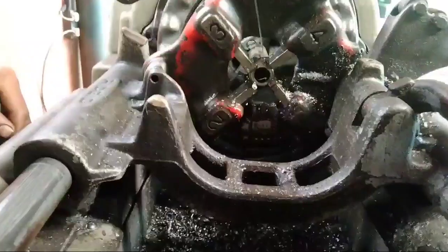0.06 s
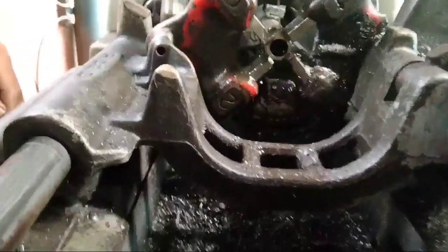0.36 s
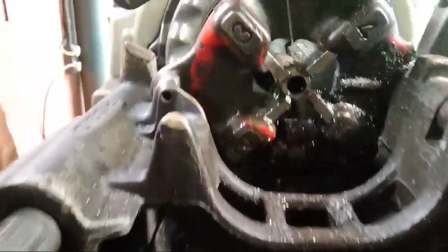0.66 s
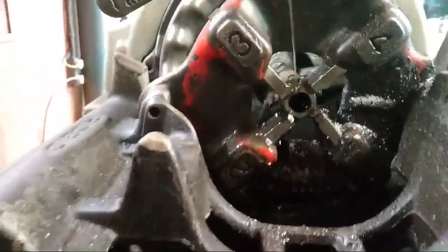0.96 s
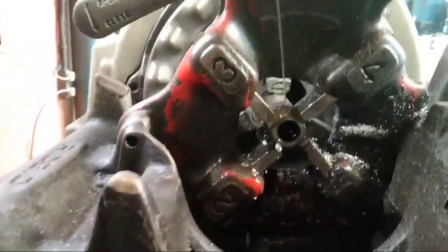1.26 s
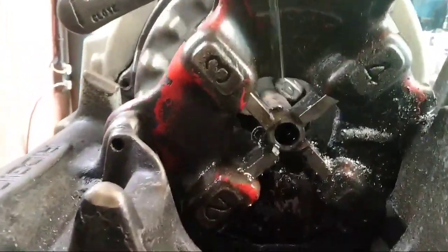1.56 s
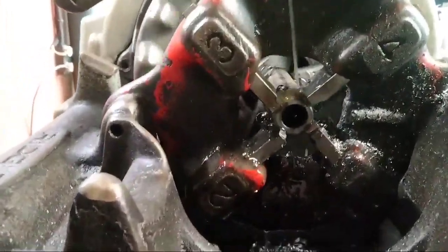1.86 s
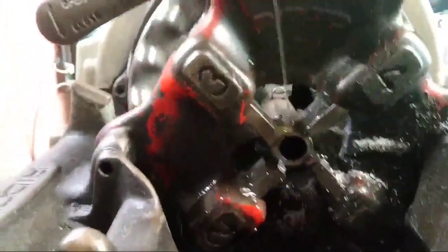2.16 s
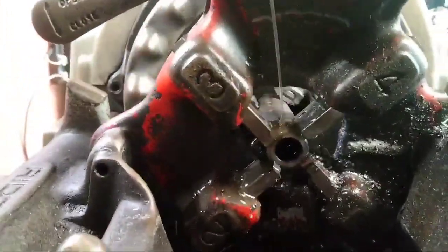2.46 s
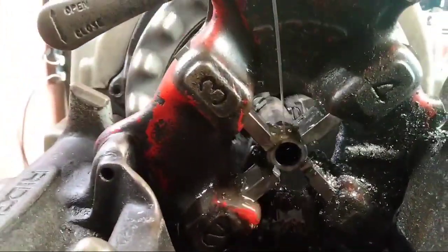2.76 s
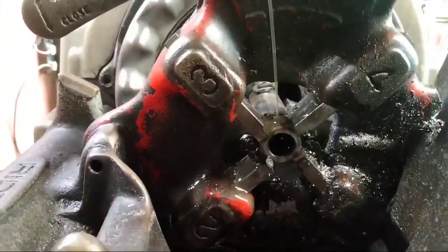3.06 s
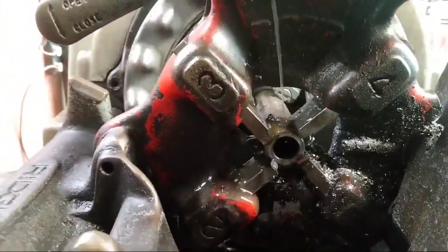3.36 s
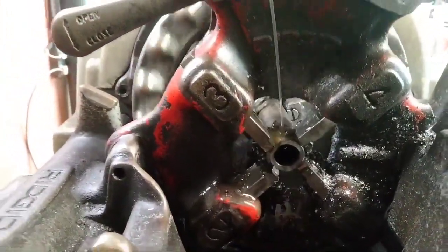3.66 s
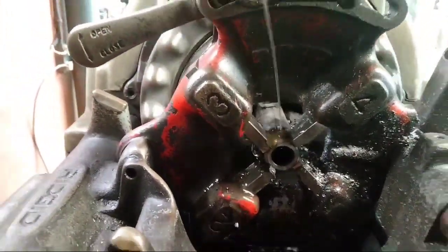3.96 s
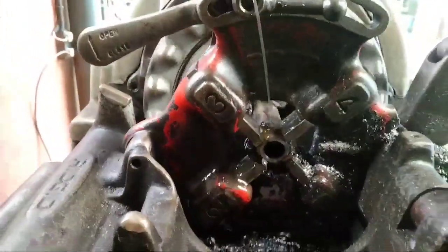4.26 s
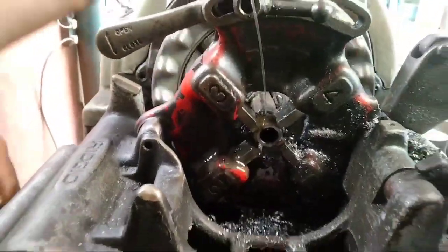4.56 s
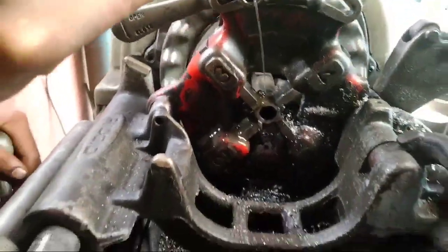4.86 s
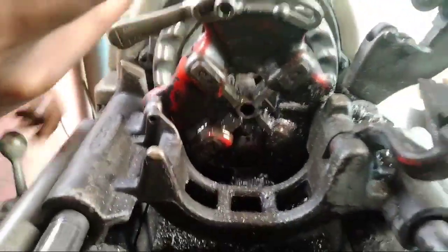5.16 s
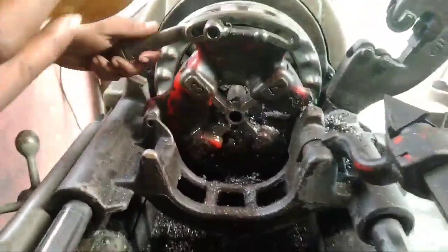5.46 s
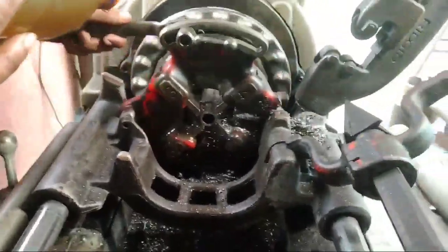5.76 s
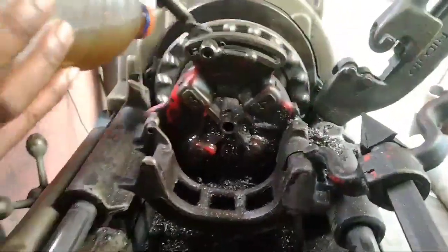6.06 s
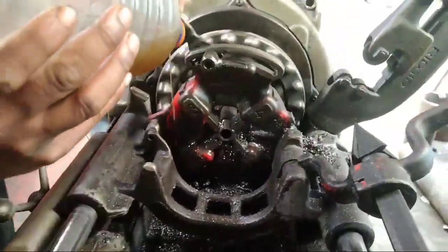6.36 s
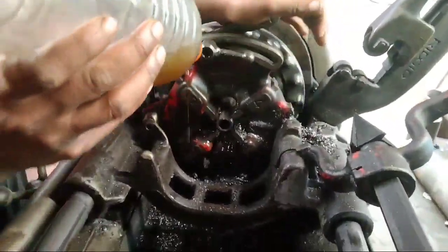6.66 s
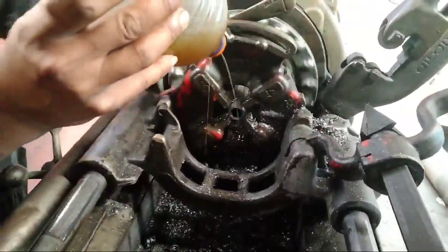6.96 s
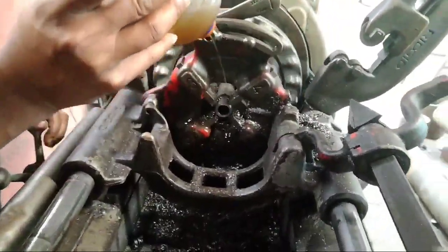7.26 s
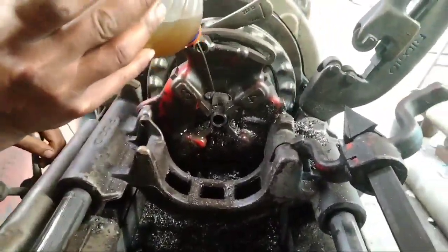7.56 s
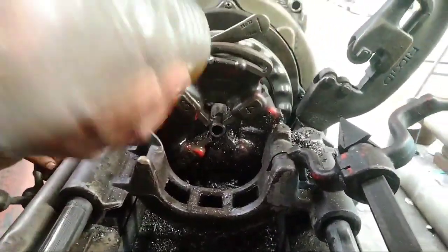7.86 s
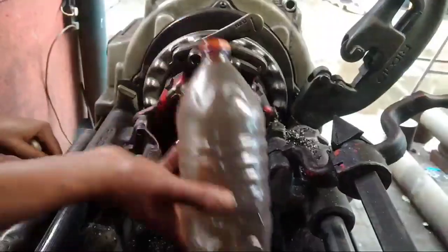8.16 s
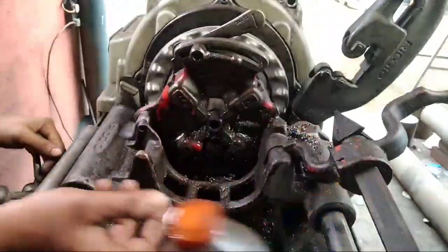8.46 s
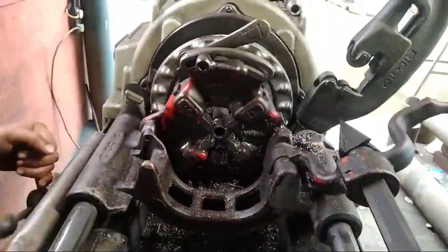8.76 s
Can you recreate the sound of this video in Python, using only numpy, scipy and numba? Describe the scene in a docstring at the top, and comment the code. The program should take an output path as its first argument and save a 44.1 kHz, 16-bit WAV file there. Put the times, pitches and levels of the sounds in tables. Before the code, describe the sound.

A pipe threading machine is heard from the start, cutting a thread with a steady, clear motor hum. Gears and bearings whine above it and the dies grind, with light metallic squeaks in the first second and a half and another near 3 seconds. From about 1 to 4.5 seconds the microphone is close to the die head, so the sound is slightly louder and the hiss of metal chips brighter. More small squeaks come around 5.5 seconds.

Near 6 seconds the dies open and the hum drops away. The motor runs up a little in pitch, leaving a softer, rougher whir of fan air and loose gears. A small knock comes at about 6.7 seconds, a faint high whistle around 7.3, and a thin ring from roughly 7 to 8.5 seconds. At about 8.5 seconds the motor begins to slow and its tone falls.

```python
"""At the die head of a pipe threading machine. Under load the fast motor hums a clear tone,
gears and bearings whine at ratios of its speed, the oiled dies grind, chips hiss and metal squeaks.
Near 6 s the dies open: the hum drops away, the motor runs up, slack gears sing softly and
fan air and loose teeth leave a rough whir, with a high whistle and a ring. At the end the motor slows."""
import sys
import numpy as np
from scipy import signal
from scipy.fft import rfft, irfft
from scipy.io import wavfile
from numba import njit

SR = 44100
rng = np.random.default_rng(int(sys.argv[2]) if len(sys.argv) > 2 else 0)


def to_wav(sig):
    """Store sig (one row per channel, or 1-D mono) as 16-bit WAV at the path in sys.argv[1].

    Samples outside -1..1 are clipped; the rate is SR.
    """
    pcm = np.clip(np.atleast_2d(sig), -1, 1) * 32767
    pcm = np.round(pcm).astype(np.int16)
    wavfile.write(sys.argv[1], SR, pcm.T)  # frames by channels


N = 392490

START_S, EASE_S, OPEN_S, SLACK_S, SLOW_S = 0.11, 4.04, 5.87, 6.21, 8.53
ATTACK_S, LET_GO_S = 0.064, 0.014
FREE_HZ, DRAG_RUN_UP_S, FREE_RUN_UP_S, SLOWING_HZ_PER_S = 397, .72, .35, 150
WHEEL_RATIO, FRONT_RATIO, REAR_RATIO, RACE_RATIO = .2717, 1.04875, 3.078, 5.312  # per shaft turn
HISS_FAR_HZ, HISS_NEAR_HZ, TREBLE_HZ, TOP_HZ = 3400, 7620, 4560, 15450
WHIR_DB, WHIR_LOADED_DB, WHIR_SCREENED_DB = -0.86, -4, -8
FLUTTER_HZ, FLUTTER_DEPTH = 28.3, 0.31

# shaft speed in the cut (time [s], rate [Hz])
CUT_SPEED = [(0.25, 354.1), (0.8, 348.9), (1.4, 348.2), (1.85, 343.5), (2.1, 343.3), (2.65, 345.7),
             (2.8, 342.3), (3.1, 341.2), (3.6, 342.7), (3.95, 345.8), (4.2, 342.0), (4.8, 342.7),
             (5.25, 344.2), (5.4, 341.5), (5.85, 340.3)]
# microphone path to the die head and back (time [s], closeness [0-1], chip hiss level [dB])
MIC_PATH = [(.2, 0.1, -85), (.38, 0, -94), (.56, 0.3, -102), (.75, 0.4, -99), (1, 0.7, -111),
            (1.5, 0.99, -101), (2.2, 0.97, -92.5), (3.6, 0.94, -92), (4.15, 0.88, -90), (4.5, 0.83, -94),
            (4.9, 0.51, -95.5), (5.4, 0.17, -89.5), (5.8, 0.02, -88), (6.3, 0.05, -105)]

# partials (multiple of the part's rate, level [dB])
SHAFT_PARTIALS = [(2, -56), (3, -67), (4, -74), (6, -77), (7, -67.5), (10, -82), (21, -82), (22, -88)]
FRONT_PARTIALS = [(4, -59.5), (8, -72.5), (12, -60), (16, -67), (18, -91), (19, -79), (20, -76), (21, -83),
                  (22, -85.5), (23, -79), (24, -72.5), (25, -84), (27, -82), (28, -79.5), (29, -80),
                  (30, -89), (31, -79), (32, -86), (34, -88), (35, -77), (36, -78), (37, -86), (39, -92),
                  (40, -88), (43, -86)]
REAR_PARTIALS = [(1, -73.5), (2, -62), (3, -66.5), (4, -64), (5, -78), (7, -96), (8, -91)]
RACE_PARTIALS = [(1, -69), (2, -76.5), (4, -91)]
# gear wheel partials (multiple of wheel rate, level [dB], swell period [s], crest [s], depth [0-1])
WHEEL_PARTIALS = [(1, -89, 1.39, 0.84, 0.45), (2, -74, 1.4, 0.98, 0.17), (3, -62.5, 0.9, 1.39, 0.24),
                  (4, -63, 0.8, 1.51, 0.13)]
# sum and difference tones of the mesh (multiple of shaft rate, level [dB])
MESH_TONES = [(0.737, -70.5), (1.274, -72.5), (1.621, -72.5), (1.73, -71), (2.096, -67), (2.26, -70.5),
              (2.543, -77), (3.29, -80.5), (3.354, -70.5), (3.651, -78), (3.76, -74), (4.02, -73),
              (3.92, -65), (4.47, -69.5), (4.79, -75), (5.19, -65.5), (5.26, -75), (5.59, -72), (6.31, -80),
              (6.7, -75), (7.24, -82), (8.09, -72), (8.57, -85), (9.506, -82), (10.91, -81), (11.48, -68.5),
              (11.8, -79), (11.98, -71), (12.04, -68), (12.23, -71), (19.3, -85), (19.86, -85), (22.2, -84)]
# slack gear tones (multiple of wheel rate added to shaft rate, level [dB])
SLACK_TONES = [(1, -66.5), (2, -65.5)]
# bearing pressure depth (at wheel rate [0-1], at twice wheel rate [0-1], at shaft rate [0-1])
PRESS_DEPTHS = (0.19, 0.12, 0.24)

# noise spectra (frequency [Hz], density [dB/Hz])
GRIND_SPECTRUM = [(25, -135), (75, -118), (150, -104.6), (230, -94.5), (310, -81.5), (390, -88), (470, -95),
                  (620, -84), (900, -89), (1150, -89), (2200, -86), (4200, -96.5), (5000, -103),
                  (10000, -109), (15000, -122)]
WHIR_SPECTRUM = [(40, -124), (130, -111), (220, -96.5), (330, -82), (460, -88), (700, -81.5), (1150, -95),
                 (1600, -88), (2500, -87), (3600, -82.5), (4700, -96.5), (7500, -100.3), (9200, -107.5),
                 (10000, -104.5), (11200, -106.5), (12000, -113.5), (12900, -107), (14000, -118),
                 (15000, -120)]
# resonances (centre [Hz], width [Hz], gain [dB])
CASTING_MODES = [(1075, 51, 9.5), (1262, 14, 9.5), (1600, 31, 0.5), (2242, 44, 9.5), (2885, 39, 9),
                 (2994, 72, 9.5), (3250, 51, 5), (4700, 34, 3), (4570, 210, -21)]
HEAD_MODES = [(566, 31, 6.5), (990, 45, -4.5), (1177, 58, 5), (1325, 68, 7.5), (2130, 300, 2.5),
              (2440, 23, 7.5), (2420, 140, -0.5), (4260, 380, 6), (4880, 550, 4.5)]
DIE_MODES = [(4120, 480, 5.5), (5250, 240, 4), (6500, 120, 1), (5730, 1900, -5), (7300, 110, 5),
             (7540, 170, 5), (8850, 200, 1), (7730, 250, -6), (8150, 430, 3), (11100, 1600, 8),
             (15100, 3000, -2)]
HOUSING_MODES = [(350, 240, 2), (665, 42, 5.5), (752, 67, 3), (903, 31, 3.5), (1025, 25, 4.5),
                 (1088, 22, 8), (1890, 62, 2), (2180, 110, 7), (2390, 49, 3), (2930, 21, 8.5),
                 (3040, 44, 6.5), (3430, 91, -9), (3340, 32, 7.5), (3450, 36, 11), (3620, 30, 4.5),
                 (3820, 370, 3.5), (11530, 110, 8)]

# part levels (cutting [dB], change when close [dB], as cut eases [dB], as dies open [dB], free [dB])
HUM_DB = (-46.5, 1.5, -4.5, -3.5, -64)
WHEEL_DB = (0.2, 0.1, -5, -4, -18)
SHAFT_DB = (-2.5, 2, 1, -7.5, -13)
MESH_DB = (-3.5, 2.5, 1, -15, -8)
FRONT_DB = (-5, 2, -1.5, 1.5, -18)
REAR_DB = (-1, 0.9, 0, -8.5, -21)
TREBLE_DB = (-6.5, 7, 4, 4, -11)
GRIND_DB = (-2, 1.5, -8, 4, -11.5)

# swells and dips (centre [s], length [s], change [dB])
HUM_SWELLS = [(1.53, .15, -2.5), (2.76, 0.14, -2), (4.13, 0.17, -2.5), (5.96, 0.16, 4.5), (6.19, 0.09, 1.5),
              (8.88, 0.4, 6.5)]
SHAFT_DIPS = [(.2, .7, -3)]  # overtones build as the dies bite
WHINE_TREBLE_DIPS = [(1.4, 1.6, -3), (6.1, 0.35, -6)]
GRIND_DIPS = [(5.94, .1, -6), (6.28, 0.17, -13)]  # dies let go, gears go slack
GRIND_TREBLE_SWELLS = [(.85, 0.37, 1), (5.9, 1.2, -5)]
WHIR_SWELLS = [(5.95, 0.18, -1.5), (6.29, .19, -2), (6.62, .25, 0.4), (7.07, 0.38, 0.7)]
# single bearing partials squeal or sink (centre [s], length [s], multiple of its rate, change [dB])
FRONT_SQUEALS = [(2.25, 0.43, 4, 4.5), (3.22, 0.17, 4, -9), (4.9, 0.93, 4, 8), (5.68, .25, 4, 4.5),
                 (6.14, 0.11, 4, 8), (0.98, 0.8, 8, 12), (1.85, .35, 8, -3), (3.6, .6, 8, -8),
                 (4.3, 0.38, 8, 4.5), (6.07, 0.13, 8, 6.5), (0.68, 0.87, 12, 9.5), (2.1, 1.6, 12, -4.5),
                 (3.7, .6, 12, -3), (4.19, .36, 12, 6.5), (4.93, 0.99, 12, 8.5), (6.3, 0.6, 12, -12),
                 (.82, 0.4, 16, 4.5), (1.2, .3, 16, -8), (1.6, 1.3, 16, -3.5), (4.6, 0.87, 16, 3),
                 (5.8, 0.73, 16, -8), (3.2, .9, 24, 5.5), (4.22, 0.22, 24, 9), (0.97, 0.8, 27, 13),
                 (4.8, 0.94, 29, 9), (4.2, .2, 36, 4.5), (5.45, 0.18, 36, 9)]
REAR_SQUEALS = [(.3, 0.45, 1, 6.5), (0.95, .8, 2, -8), (4.9, 0.76, 2, -13), (5.7, 0.27, 2, 2.5),
                (6.09, 0.17, 2, 9), (0.89, 0.53, 3, 4.5), (5, 0.45, 3, -5), (.65, 0.97, 4, 4),
                (1.9, 1, 4, -16), (3.1, 0.66, 4, 4.5), (4.8, .25, 4, -11), (5.15, 0.88, 4, 5.5),
                (4.9, .2, 5, 9)]
# metallic squeaks and rings in the cut; a high whistle and a ring while running free
# (centre [s], length [s], pitch [Hz], level [dB], phase jitter [rad])
SQUEAKS_AND_RINGS = [(0.26, 0.4, 3600, -63, .95), (.35, 1.14, 1125, -60, 0.9), (0.5, 0.45, 3000, -62, .95),
                     (.38, 0.33, 8300, -84, .6), (0.63, 0.14, 8310, -74, .9), (1, 0.93, 1150, -63, 0.9),
                     (1, 0.91, 8400, -85, .6), (3, 0.58, 2443, -62, 0.7), (5.45, .3, 1810, -63, 1),
                     (5.42, .2, 2000, -62, 0.9), (5.8, 0.2, 3140, -62, .7), (5.55, .5, 2040, -62.5, 0.8),
                     (5.65, .5, 4100, -62, 0.8), (7.27, 0.66, 6900, -73, 0.45), (7.8, 1.5, 3484, -65, .9)]
# knock in the whir (time [s], gain [dB], decay [s])
KNOCKS = [(6.657, -4, 0.0062)]

TIME_S = np.arange(N) / SR


def undb(db):
    """Decibels to gain."""
    return np.exp(np.float32(db) * np.float32(np.log(10) / 20))


def curves(table):
    """Each column interpolated over time."""
    times_s, *columns = np.transpose(table)
    return [np.interp(TIME_S, times_s, column) for column in columns]


def ramp(start_s, length_s):
    """Linear rise from 0 to 1."""
    return np.clip((TIME_S - start_s) / length_s, 0, 1)


def arch(centre_s, length_s):
    """Rounded rise to 1 and back, length_s wide at half height."""
    return 2 ** -np.minimum(np.abs(2 * (TIME_S - centre_s) / length_s) ** 3, 40)


def swells_db(table):
    """Sum of rounded level changes."""
    return sum(db * arch(centre_s, length_s) for centre_s, length_s, db in table)


def walk(rate_hz):
    """Random glide, spread near 1."""
    step = max(int(SR / rate_hz), 2)
    points = rng.standard_normal((N // step + 3, 1), dtype=np.float32)
    glides = points[:-1] + np.diff(points, axis=0) * np.arange(step, dtype=np.float32) / step
    return 1.22 * glides.ravel()[rng.integers(step):][:N]


def highpass(x, hz):
    """Zero-phase high-pass."""
    return signal.sosfiltfilt(signal.ellip(6, .1, 40, hz, "high", fs=SR, output="sos"), x)


@njit
def bandpass(x, centre_hz, width_hz):
    """Moving band-pass, unity peak gain."""
    y, band, low = np.empty(len(x)), 0., 0.
    for i in range(len(x)):
        g, damping = np.tan(np.pi * centre_hz[i] / SR), width_hz[i] / centre_hz[i]
        v = (band + g * (x[i] - low)) / (1 + g * (g + damping))
        band, low, y[i] = 2 * v - band, low + 2 * g * v, damping * v
    return y


def resonate(x, modes, colour_db=0):
    """Peaks and notches on top of a broad colour."""
    hz = np.arange(N // 2 + 1, dtype=np.float32) * SR / N
    modes_db = sum(db / (1 + (2 * (hz - centre_hz) / width_hz) ** 2) for centre_hz, width_hz, db in modes)
    return irfft(rfft(np.float32(x)) * undb(colour_db + modes_db), N)


def noise(spectrum, modes):
    """Noise shaped by a spectrum and resonances."""
    points_hz, levels_db = np.transpose(spectrum)
    bins_hz = np.arange(1, N // 2 + 2) * SR / N
    colour_db = np.interp(np.log(bins_hz), np.log(points_hz), levels_db)
    return resonate(rng.standard_normal(N), modes, colour_db) * np.sqrt(SR / 2)


def tone(angle, rms_db, waver_db, waver_hz):
    """Sine of wavering level; angle in radians."""
    turns = angle / (2 * np.pi) + rng.random()
    wave = np.sin(np.float32(turns - np.floor(turns)) * (2 * np.pi))
    return 2 ** .5 * undb(rms_db + waver_db * walk(waver_hz)) * wave


def partials(angle, table, waver_db, waver_hz, fade_db=0, squeals=()):
    """Harmonics of a rotation; random fading grows by fade_db per order."""
    total = 0
    for order, db in table:
        own_squeals = [(s, length_s, change_db) for s, length_s, k, change_db in squeals if k == order]
        level_db = db + swells_db(own_squeals) + fade_db * order * np.tanh(walk(7.6))
        total += tone(order * angle, level_db, waver_db, waver_hz)
    return total


def part_db(levels_db, near):
    """Level of a part through cutting, easing, die opening and free running."""
    cut_db, near_db, eased_db, open_db, free_db = levels_db
    eased = ramp(EASE_S, OPEN_S - EASE_S) ** 1.3
    opened = ramp(OPEN_S, SLACK_S - OPEN_S)
    slack = ramp(SLACK_S - LET_GO_S / 2, LET_GO_S)
    loaded_db = cut_db + near_db * near + eased_db * eased + open_db * opened
    return (1 - slack) * loaded_db + slack * free_db


def motor_load():
    """Load share: decays slowly while the opening dies drag, then faster."""
    dragging_s = np.clip(TIME_S - OPEN_S, 0, SLACK_S - OPEN_S)
    free_s = np.maximum(TIME_S - SLACK_S, 0)
    return np.exp(-dragging_s / DRAG_RUN_UP_S - free_s / FREE_RUN_UP_S)


def motor_speed_hz(load):
    """Load holds the motor below free speed; at the end it slows steadily."""
    (cutting_hz,) = curves(CUT_SPEED)
    slowing_hz = SLOWING_HZ_PER_S * np.maximum(TIME_S - SLOW_S, 0)
    return FREE_HZ + load * (cutting_hz - FREE_HZ) - slowing_hz


def motor_hum(shaft, near):
    """The spinning shaft hums one clear tone."""
    return tone(shaft, part_db(HUM_DB, near) + swells_db(HUM_SWELLS), waver_db=0.4, waver_hz=30)


def gear_drone(wheel):
    """Low gear wheel partials, each beating slowly and evenly."""
    angle = wheel + 0.1 * walk(18)
    total = 0
    for order, db, period_s, crest_s, depth in WHEEL_PARTIALS:
        beat = 1 + depth * np.cos(2 * np.pi * (TIME_S - crest_s) / period_s)
        total += tone(order * angle, db, waver_db=1.1, waver_hz=13) * beat
    return total


def gear_mesh(shaft):
    """Meshing parts give sum and difference tones."""
    return sum(tone(ratio * shaft + 0.31 * walk(18), db, waver_db=2.5, waver_hz=9)
               for ratio, db in MESH_TONES)


def bearing(shaft, wheel, ratio, table, slip_rad, chatter_rad, fade_db, squeals=()):
    """Balls slip and chatter over a flaw, fraying high partials; wheel and shaft press on them."""
    angle = ratio * shaft + slip_rad * walk(25) + chatter_rad * walk(160)
    rolling = partials(angle, table, waver_db=1.52, waver_hz=26, fade_db=fade_db, squeals=squeals)
    pressure = sum(depth * np.cos(np.float32(turn) + 2 * np.pi * rng.random())
                   for depth, turn in zip(PRESS_DEPTHS, (wheel, 2 * wheel, shaft)))
    return rolling * (1 + pressure)


def drive_whine(shaft, wheel, near):
    """Gears and bearings whine through the casting; the treble flutters."""
    gears = gear_drone(wheel) * undb(part_db(WHEEL_DB, near))
    overtones = partials(shaft, SHAFT_PARTIALS, waver_db=1.13, waver_hz=14)
    overtones *= undb(part_db(SHAFT_DB, near) + swells_db(SHAFT_DIPS))
    mesh = gear_mesh(shaft) * undb(part_db(MESH_DB, near))
    race = bearing(shaft, wheel, RACE_RATIO, RACE_PARTIALS, slip_rad=0.16, chatter_rad=0.061, fade_db=3)
    front = bearing(shaft, wheel, FRONT_RATIO, FRONT_PARTIALS,
                    slip_rad=0.026, chatter_rad=0.013, fade_db=0.12, squeals=FRONT_SQUEALS)
    rear = bearing(shaft, wheel, REAR_RATIO, REAR_PARTIALS,
                   slip_rad=0.13, chatter_rad=0.044, fade_db=0.9, squeals=REAR_SQUEALS)
    whine = mesh + front * undb(part_db(FRONT_DB, near)) + (rear + race) * undb(part_db(REAR_DB, near))
    treble_db = part_db(TREBLE_DB, near) + swells_db(WHINE_TREBLE_DIPS) + 2 * walk(130)
    whine += highpass(whine, TREBLE_HZ) * (undb(treble_db) - 1)
    return resonate(gears + overtones + whine, CASTING_MODES)


def grinding(shaft, wheel, near, hiss_db):
    """Teeth and dies scrape; scrape and chip hiss pulse with wheel and shaft."""
    pulse = 1 + 0.07 * np.cos(wheel) + 0.072 * np.cos(shaft) + 0.069 * np.cos(2 * shaft)
    level_db = part_db(GRIND_DB, near) + swells_db(GRIND_DIPS)
    scrape = noise(GRIND_SPECTRUM, HEAD_MODES)
    scrape *= undb(level_db + 1.23 * walk(220) + 1.27 * np.tanh(walk(24.62)))
    scrape += highpass(scrape, TREBLE_HZ) * (undb(swells_db(GRIND_TREBLE_SWELLS)) - 1)
    return (scrape + chip_hiss(near, hiss_db)) * pulse


def chip_hiss(near, hiss_db):
    """Chips hiss; an echo off the die head picks a band, higher when close, and its weak octave."""
    centre_hz = HISS_FAR_HZ * (HISS_NEAR_HZ / HISS_FAR_HZ) ** near
    width_hz = 0.34 * centre_hz
    rush = rng.standard_normal(N) * np.sqrt(SR / 2) * undb(hiss_db + 0.82 * walk(150) + 0.46 * walk(14))
    band = bandpass(bandpass(rush, centre_hz, width_hz), centre_hz, width_hz)
    octave = bandpass(rush, 2 * centre_hz, 2 * width_hz)
    return resonate(band + undb(-20.5) * octave, DIE_MODES)


def housing_whir(load, near):
    """Fan air and loose teeth rattle, louder off load; close in, the die head screens them."""
    level_db = WHIR_DB + WHIR_LOADED_DB * load + WHIR_SCREENED_DB * near + swells_db(WHIR_SWELLS)
    rattle = undb(level_db + 0.79 * walk(400) + 0.25 * walk(70) + 0.042 * walk(5.9))
    return noise(WHIR_SPECTRUM, HOUSING_MODES) * (rattle + knock_gain())


def squeaks_and_rings():
    """Frayed, fluttering metallic tones: squeaks and rings in the cut, a whistle and a ring off load."""
    flutter = 1 + FLUTTER_DEPTH * np.cos(2 * np.pi * FLUTTER_HZ * TIME_S + 0.91 * walk(11))
    total = 0
    for centre_s, length_s, hz, db, jitter_rad in SQUEAKS_AND_RINGS:
        angle = 2 * np.pi * hz * TIME_S + jitter_rad * walk(110)
        total += arch(centre_s, length_s) * tone(angle, db, waver_db=3, waver_hz=22)
    return flutter * total


def slack_gears(shaft, wheel, speed_hz):
    """Near full speed the slack gears sing unsteadily."""
    gain = np.interp(speed_hz, [360, 398], [0, 1])
    return gain * sum(tone(shaft + order * wheel + 0.47 * walk(24), db, waver_db=1.5, waver_hz=17)
                      for order, db in SLACK_TONES)


def knock_gain():
    """Envelope of a sharp blow in the housing."""
    return sum(undb(db) * (TIME_S >= start_s) * np.exp(-np.clip((TIME_S - start_s) / decay_s, 0, 20))
               for start_s, db, decay_s in KNOCKS)


def scene():
    """One shaft drives the rotating parts; job stage and microphone closeness set the levels."""
    near, hiss_db = curves(MIC_PATH)
    load = motor_load()
    speed_hz = motor_speed_hz(load)
    shaft = 2 * np.pi * np.cumsum(speed_hz * (1 + 0.000787 * walk(12))) / SR  # angle [rad]
    wheel = WHEEL_RATIO * shaft
    tones = motor_hum(shaft, near) + drive_whine(shaft, wheel, near)
    tones += squeaks_and_rings() + slack_gears(shaft, wheel, speed_hz)
    noises = grinding(shaft, wheel, near, hiss_db) + housing_whir(load, near)
    attack = (1 - np.exp(-np.maximum(TIME_S - START_S, 0) / ATTACK_S)) ** 2
    return ((tones + noises) * attack)[None]


def record(dry):
    """Steep low-pass at TOP_HZ."""
    return signal.sosfilt(signal.ellip(12, .2, 80, TOP_HZ, fs=SR, output="sos"), dry)


dry = scene()
out = record(dry)
to_wav(out)
```